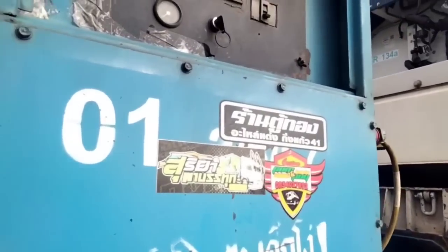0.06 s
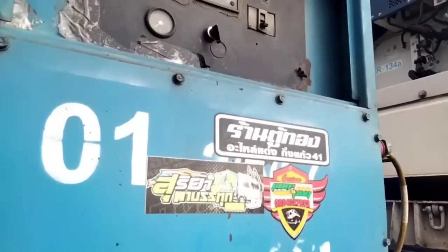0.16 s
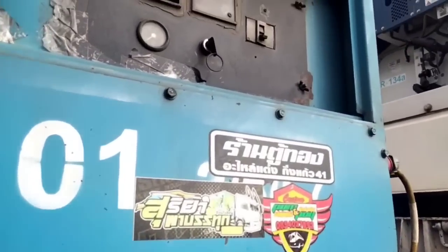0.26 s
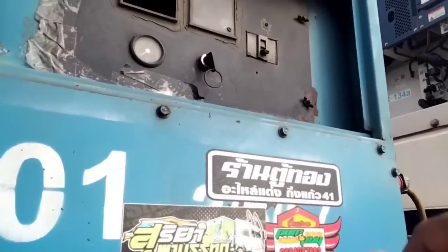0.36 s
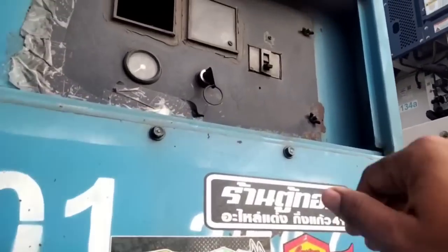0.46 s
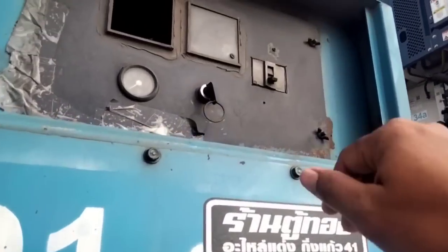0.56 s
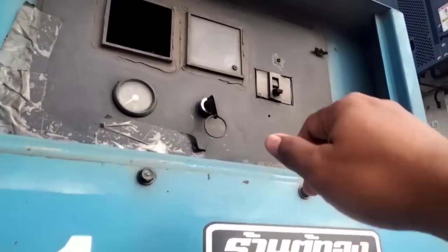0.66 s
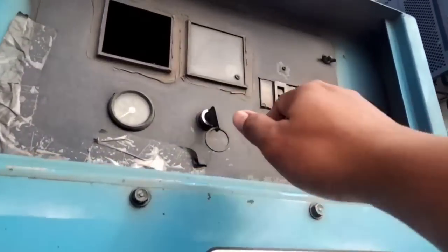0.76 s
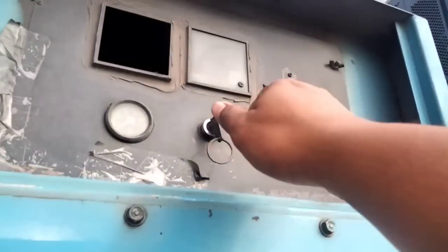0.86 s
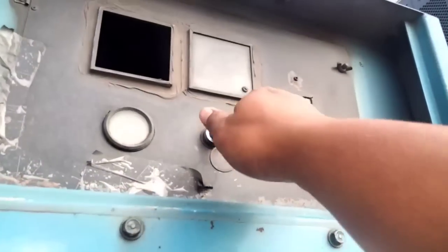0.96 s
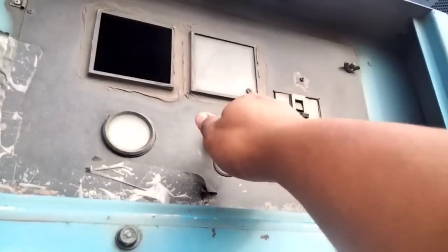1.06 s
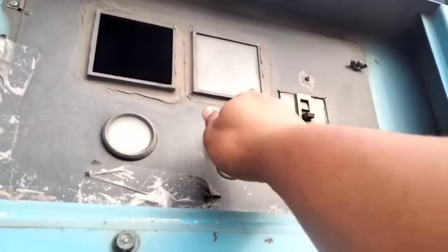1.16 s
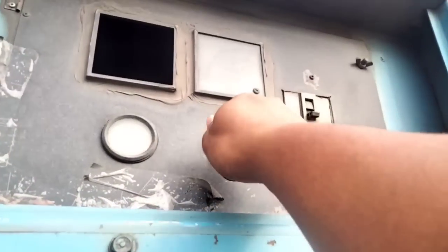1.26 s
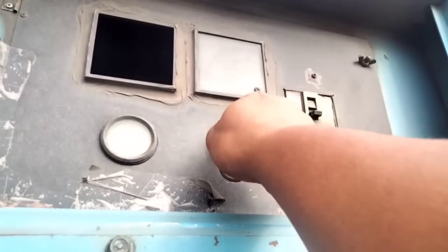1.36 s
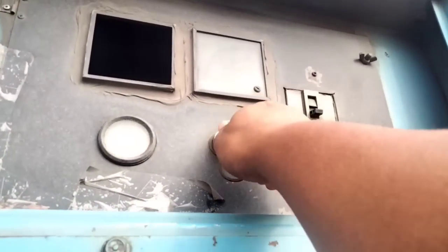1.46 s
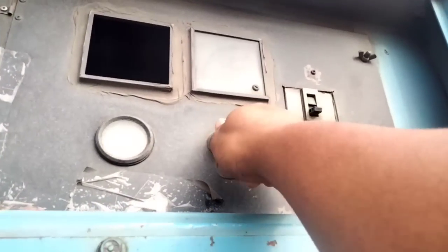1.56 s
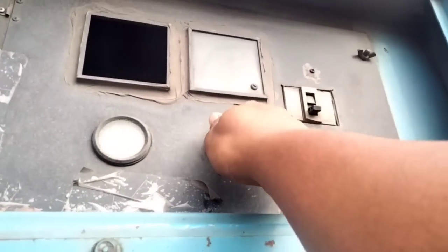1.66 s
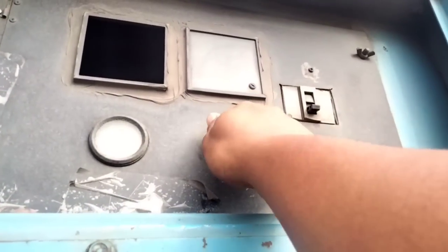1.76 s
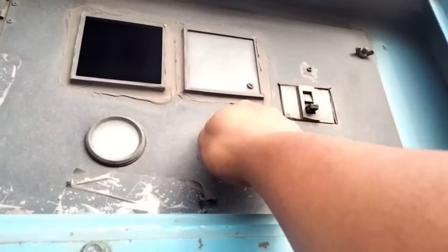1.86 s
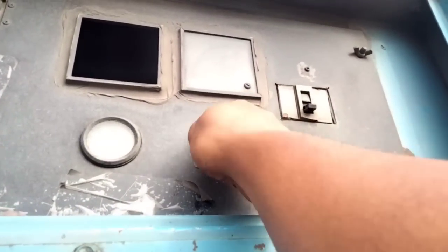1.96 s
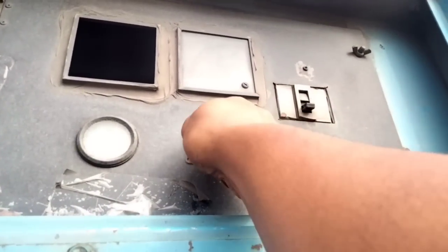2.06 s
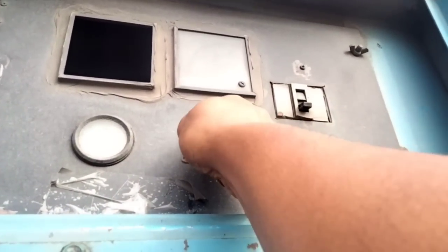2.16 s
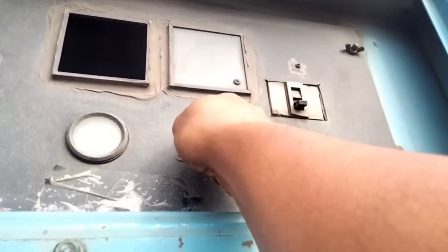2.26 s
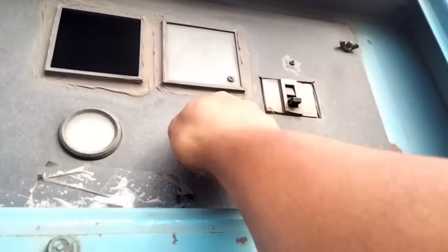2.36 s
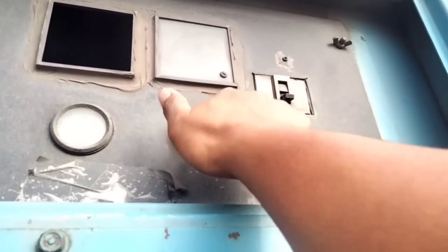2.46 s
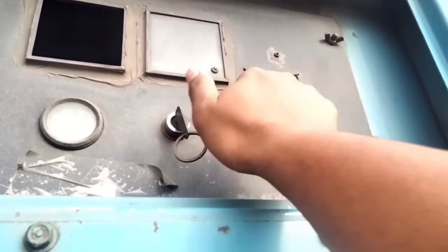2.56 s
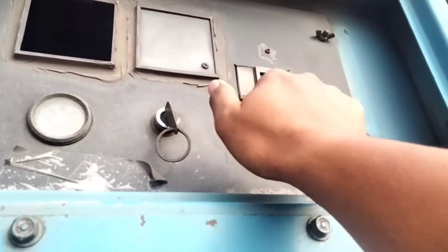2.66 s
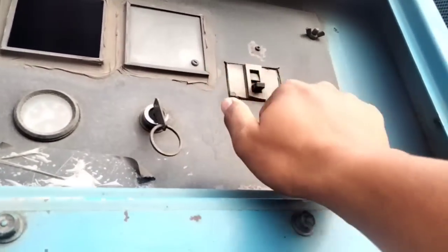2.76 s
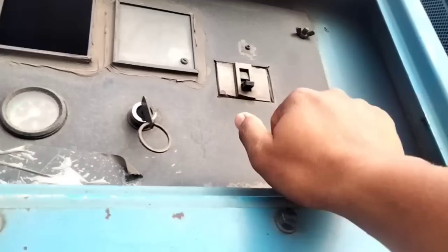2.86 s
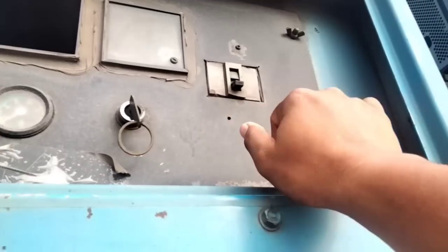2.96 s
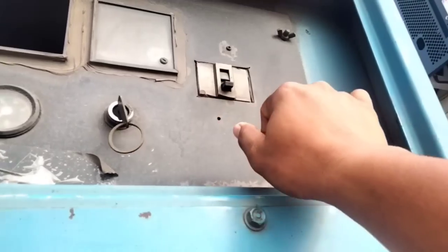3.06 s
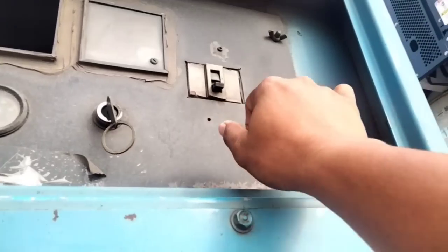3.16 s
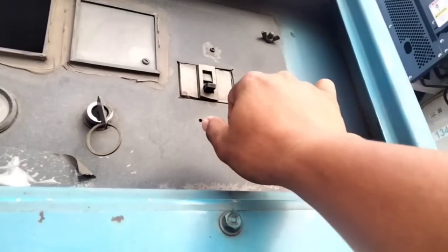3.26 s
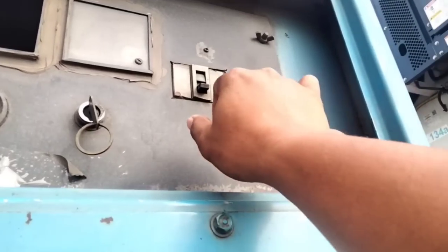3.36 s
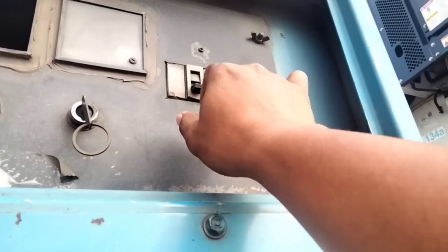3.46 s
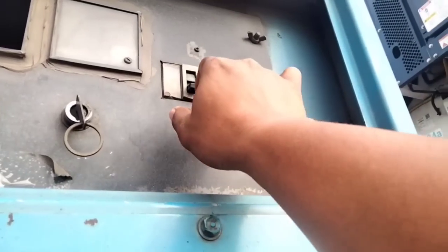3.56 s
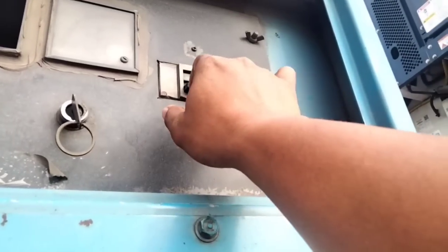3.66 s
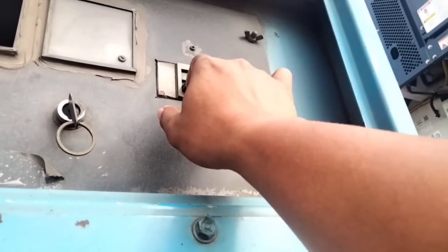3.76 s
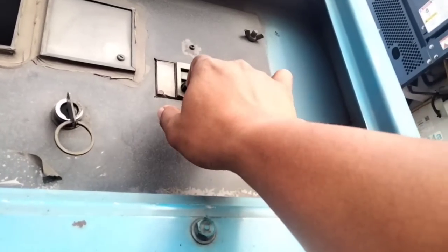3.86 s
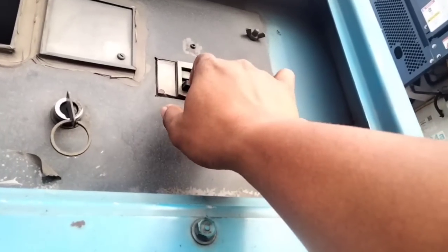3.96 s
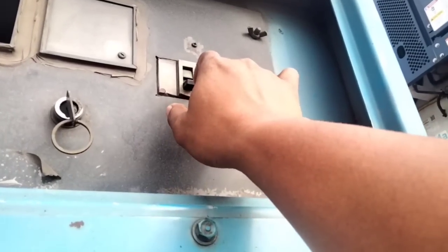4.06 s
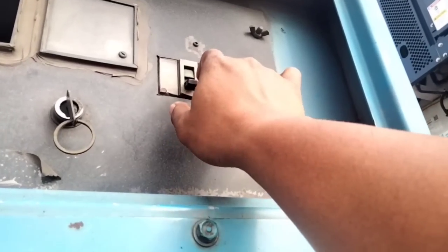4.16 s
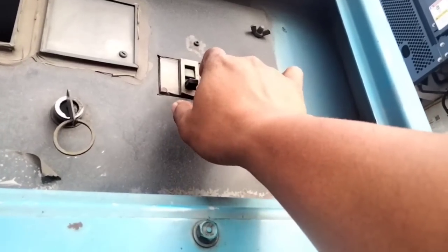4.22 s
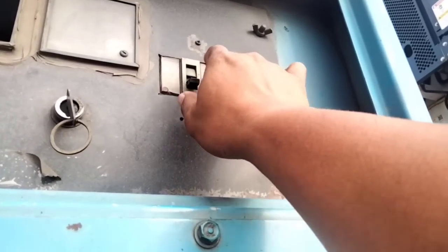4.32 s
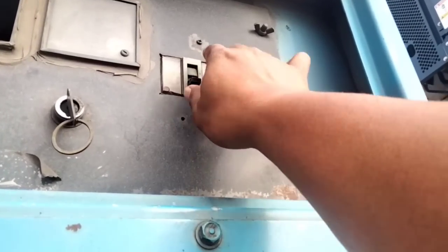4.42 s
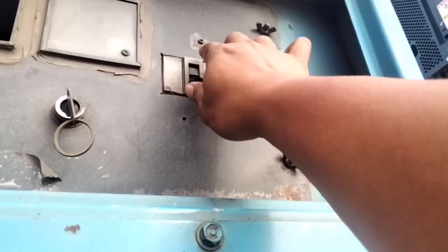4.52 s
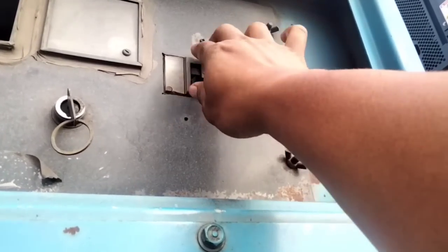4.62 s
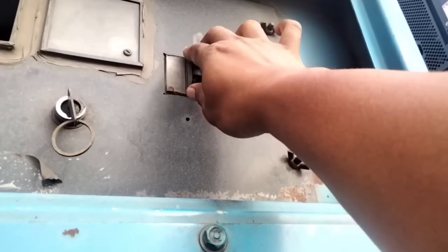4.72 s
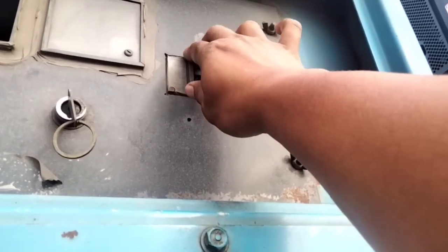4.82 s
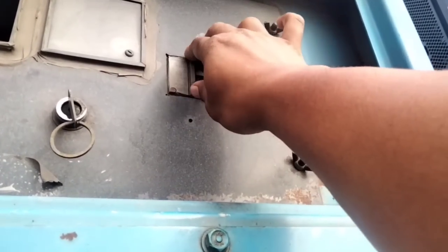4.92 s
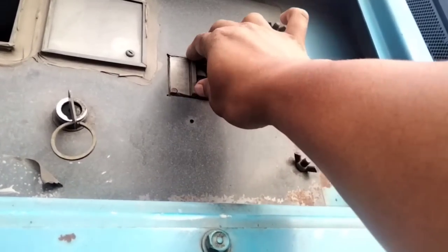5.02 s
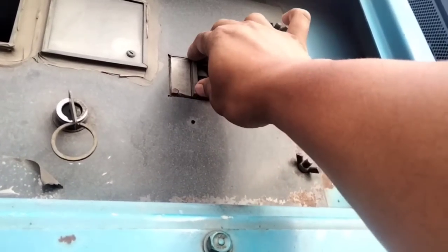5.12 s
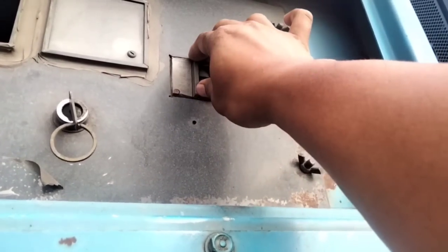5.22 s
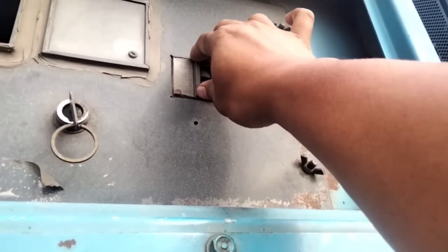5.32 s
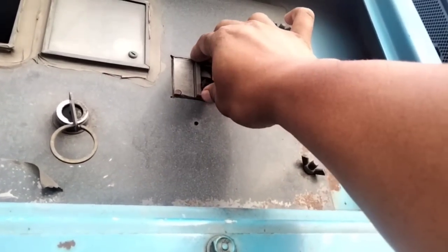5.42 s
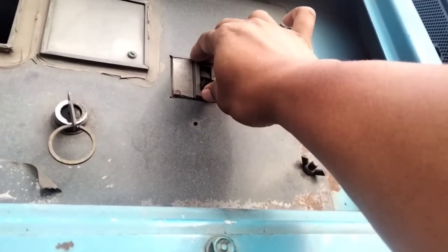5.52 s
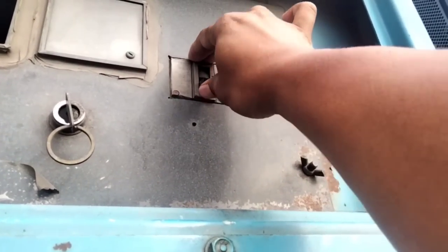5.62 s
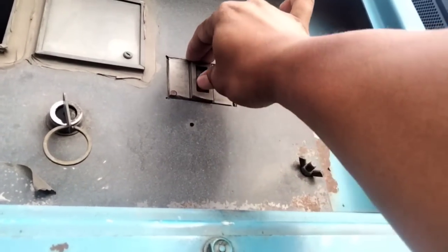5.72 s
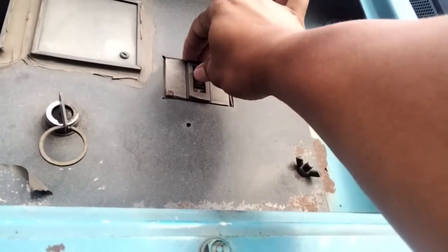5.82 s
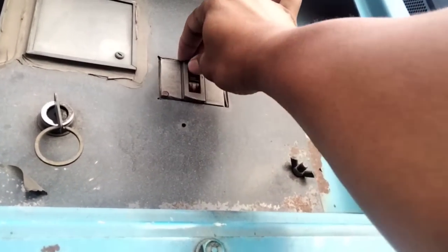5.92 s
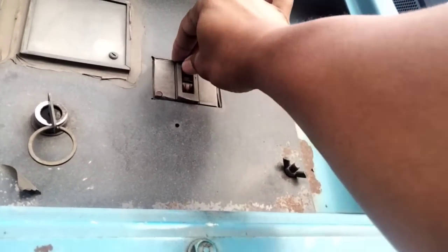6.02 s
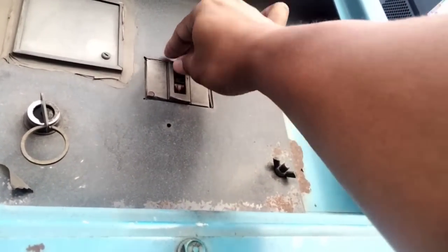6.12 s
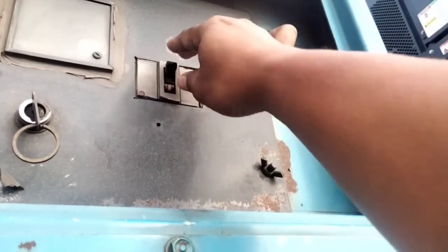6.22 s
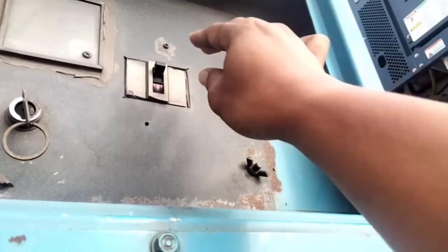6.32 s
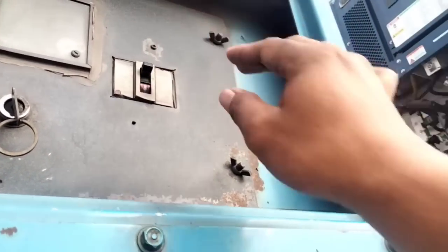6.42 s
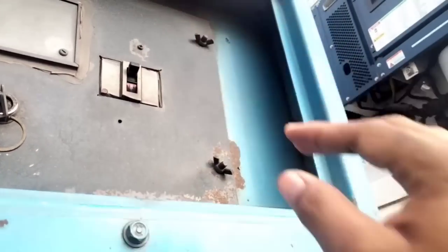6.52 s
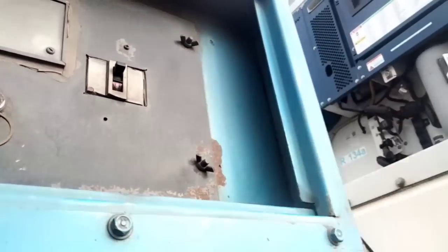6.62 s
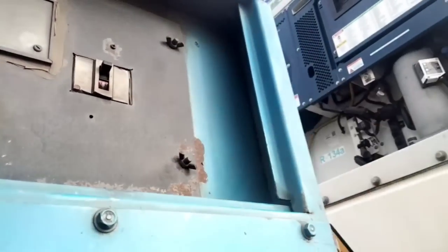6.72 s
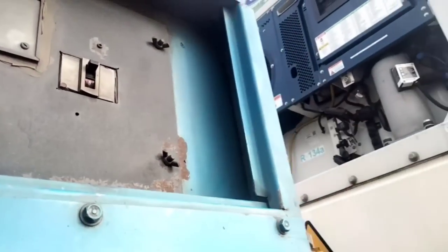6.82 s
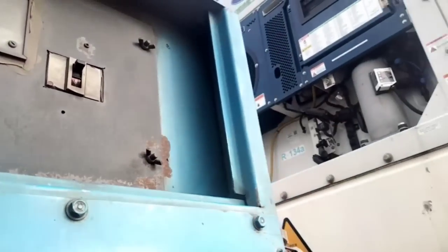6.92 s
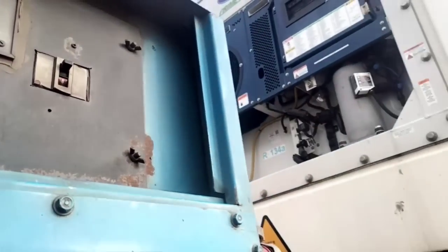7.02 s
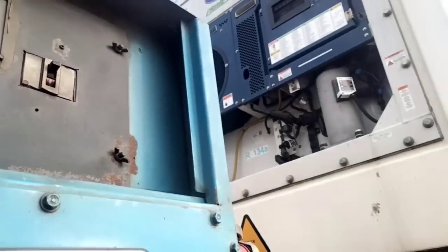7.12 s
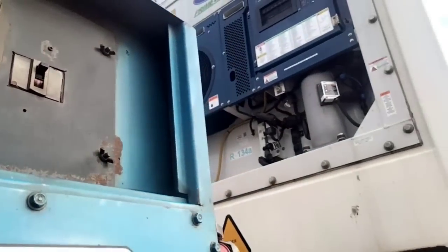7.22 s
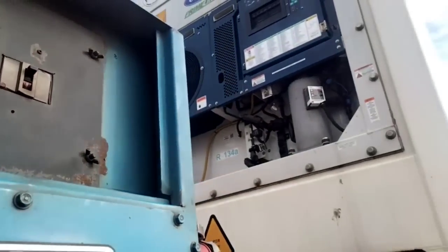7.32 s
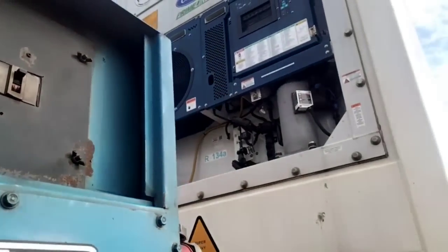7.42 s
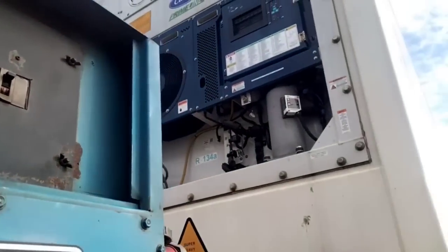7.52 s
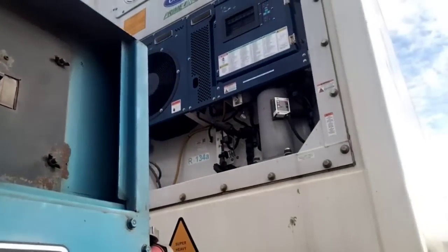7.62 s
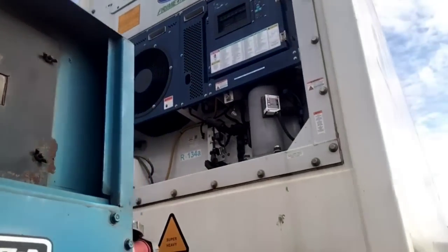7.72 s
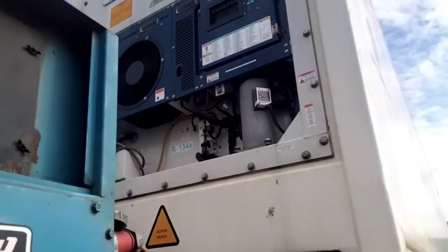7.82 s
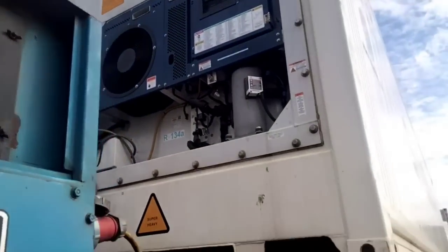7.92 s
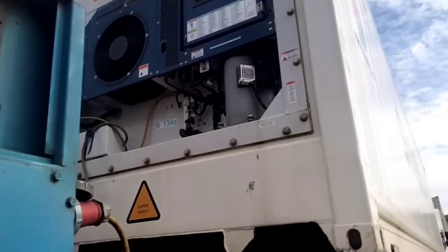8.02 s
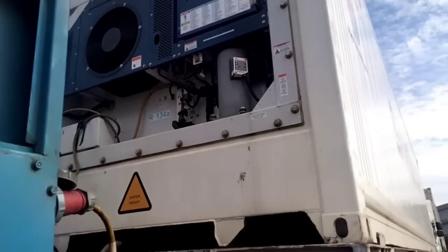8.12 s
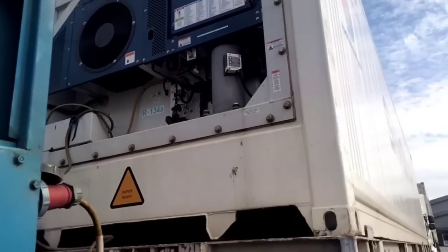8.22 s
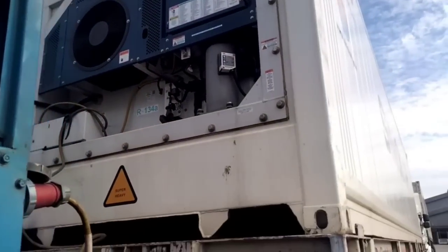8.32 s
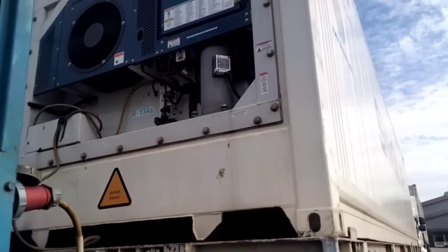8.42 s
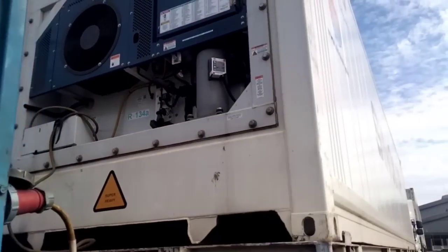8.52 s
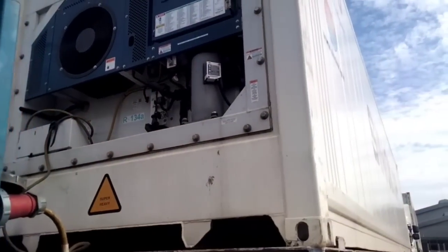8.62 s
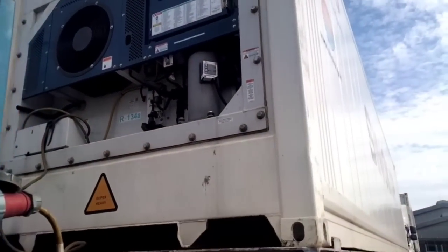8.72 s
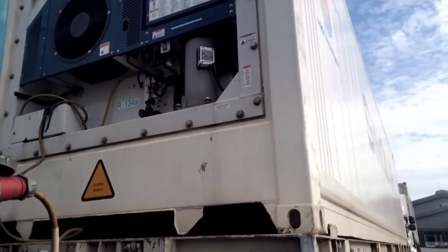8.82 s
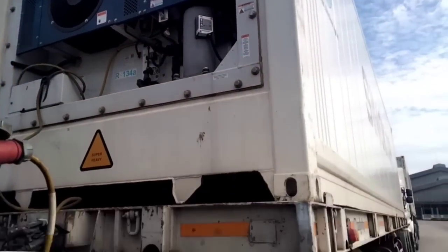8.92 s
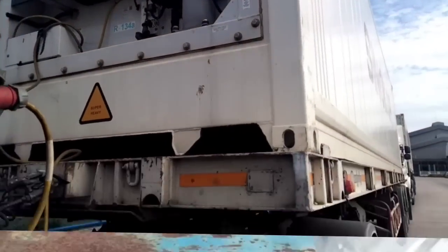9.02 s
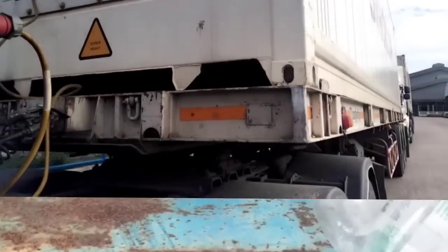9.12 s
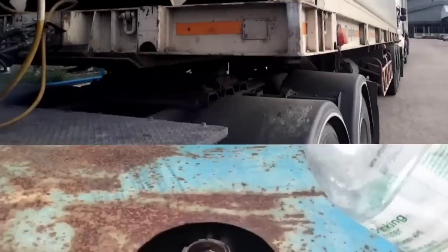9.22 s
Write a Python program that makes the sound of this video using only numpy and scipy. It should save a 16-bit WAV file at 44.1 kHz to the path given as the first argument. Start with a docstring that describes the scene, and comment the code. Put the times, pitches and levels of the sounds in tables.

```python
"""Cold start of a four-cylinder diesel generator in a container yard, heard close to its panel.
A far engine hums as summed harmonics over filtered noise; key-ring ticks are short noise bursts.
The starter clunks (noise), whines (mesh tones), grinds (noise) and squeals (unsteady sines) in two heaves.
The diesel stumbles, catches and holds speed: firing pulses, orders of the shaft, tap modes, rattling noise.
A breaker snaps, a limiter ducks behind it; the microphone moves round the side and finally turns away."""
import sys
import numpy as np
from scipy import signal
from scipy.fft import rfft, irfft, next_fast_len
from scipy.io import wavfile
from scipy.ndimage import uniform_filter1d, minimum_filter1d

SR = 44100
rng = np.random.default_rng(int(sys.argv[2]) if len(sys.argv) > 2 else 0)


def wav_record(signal):
    """Record a signal, one row per channel, as 16-bit PCM in the file named by sys.argv[1]."""
    frames = np.transpose(np.atleast_2d(signal))
    bounded = np.clip(frames, -1, 1)
    # unit amplitude maps onto the largest positive 16-bit level
    quanta = np.round(bounded * 32767).astype(np.int16)
    wavfile.write(sys.argv[1], SR, quanta)


N = 409248
TIME = np.arange(N) / SR
SIZE = next_fast_len(N, True)
HZ = np.fft.rfftfreq(SIZE, 1 / SR)

CATCH_S = 2.52  # the engine fires
WALK_S, WALK_LENGTH_S = 6.9, 0.9  # microphone leaves the panel for the side of the set
# resonances of the engine casing: f/Hz, width/Hz, lift/dB
CASING_MODES = [(88, 9, 6), (478, 57, 2.5), (833, 61, 5.5), (995, 80, 6.5), (1330, 200, 1.5),
                (2100, 130, 3), (4680, 95, 5)]


def amp(db):
    """Decibels to gain."""
    return 10 ** (np.asarray(db) / 20)


def unit(x):
    """Scales to rms 1."""
    return x / np.sqrt(np.mean(x ** 2) + 1e-20)


def noise():
    """White noise."""
    return rng.standard_normal(N)


def drift(hz):
    """Random values at rate hz, joined by straight lines, rms 1; holds the last value if they run out."""
    knots = rng.standard_normal(8000)
    return unit(np.interp(TIME * hz, np.arange(len(knots)), knots))


def sway(hz):
    """Slow, rounded wandering of rms 1: twelve sines from hz / 5 up to hz."""
    knots = TIME[::256]
    rates_hz = np.geomspace(hz / 5, hz, 12)[:, None]
    waves = np.sin(2 * np.pi * (rates_hz * knots + rng.random((12, 1))))
    return unit(np.interp(TIME, knots, waves.sum(0)))


def colour(x, points, modes=()):
    """Filters by a spectrum with resonances on top; white noise keeps its level."""
    f, db = np.transpose(points)
    gain = amp(np.interp(np.log(HZ + 1), np.log(f + 1), db))
    # steep skirts beyond the first and last point
    low_skirt = 1 + (.7 * f[0] / (HZ + 1)) ** 8
    high_skirt = 1 + (HZ / (1.3 * f[-1])) ** 8
    gain = gain / np.sqrt(low_skirt * high_skirt)
    for hz, width_hz, lift_db in modes:
        gain = gain * (1 + (amp(lift_db) - 1) / (1 + (2 * (HZ - hz) / width_hz) ** 2))
    return irfft(rfft(x, SIZE) * unit(gain), SIZE)[:N]


def dying(s, gain, t60_s, rise_s=0.00023):
    """Envelope of a blow at time s: linear rise, exponential decay."""
    age = TIME - s
    return gain * np.clip(age / rise_s, 0, 1) * np.exp(-np.log(1000) * np.maximum(age, 0) / t60_s)


def ramp(s, length_s):
    """Rises from 0 at time s to 1 over the length."""
    return np.clip((TIME - s) / length_s, 0, 1)


def settling(s, time_constant_s):
    """Stays at 1 until time s, then sinks towards 0."""
    return np.exp(-np.maximum(TIME - s, 0) / time_constant_s)


def arch(s, length_s):
    """A short swell with its top at time s."""
    return np.cos(np.pi * (TIME - s) / length_s) * (abs(TIME - s) < length_s / 2)


def crank():
    """Four-stroke cycles turned, counted from 3 s; the shaft never turns quite evenly."""
    # run-up, then governed speed: t/s, four-stroke cycle rate/Hz
    speed = [(2.01, 0), (2.3, 4), (2.5, 9.5), (2.6, 11.6), (2.8, 13.06), (3.05, 13.03), (3.25, 12.9),
             (3.5, 13.068)]
    turns = np.cumsum(np.interp(TIME, *np.transpose(speed))) / SR
    return turns - turns[3 * SR] + .0012 * drift(6)


def yard():
    """A far engine hums as harmonics, with a slow beat, over a wash of noise; it fires a little faster than the diesel."""
    # far engine tones: multiple of firing rate, level/dB
    far_orders = [(1, 2.5), (1.5, -17), (2, -15.5), (2.999, -9.5), (3.501, -23), (4.25, -19)]
    # yard wash spectrum: f/Hz, relative level/dB
    air_spectrum = [(15, -12), (25, -7), (37, -6.5), (59, -5.5), (80, -26), (165, -15.5), (189, -30),
                    (228, -14.5), (291, -29), (333, -25.5), (672, -34.5), (905, -32.5), (1040, -34),
                    (8270, -45.5), (15800, -59)]
    # yard wash resonances: f/Hz, width/Hz, lift/dB
    air_modes = [(51, 51, -25), (970, 120, -2), (2010, 190, 4), (5670, 1700, -5), (8200, 830, 4.5)]
    firing_hz, in_step_s = 53.785, 4.88  # about in step with the diesel at in_step_s
    hum_db, beat_db, beat_hz, beat_top_s = -35.5, 3, 2.2, 0.32
    in_step = 4 * (np.interp(in_step_s, TIME, crank()) - .09)
    turns = in_step + firing_hz * (TIME - in_step_s) + 0.031 * drift(3.4)
    hum = sum(amp(db + 1.2 * drift(5.2)) * np.cos(2 * np.pi * k * turns) for k, db in far_orders)
    wash = colour(noise(), air_spectrum, air_modes)
    beat = beat_db * np.cos(2 * np.pi * beat_hz * (TIME - beat_top_s))
    return hum * amp(hum_db + beat) + amp(-42.5) * wash


def panel():
    """Key-ring ticks and the breaker's snap are noise bursts; the panel rings briefly after the snap."""
    # key and ring ticks: t/s, level/dB
    key_ticks = [(1.1217, -41), (1.1631, -46), (1.1925, -48), (1.224, -54), (1.7123, -48), (1.824, -55),
                 (1.979, -47), (1.997, -37)]
    # tick spectrum: f/Hz, relative level/dB
    key_spectrum = [(2500, -12), (4500, -12), (6800, -15), (8400, -1), (10500, -10), (15500, -23)]
    # breaker spectrum: f/Hz, relative level/dB
    breaker_spectrum = [(200, -8), (1000, -4), (3000, -4), (6000, -7), (8800, 2), (11000, -1), (15500, -7)]
    breaker_s, snap_db, ring_db = 5.9803, 4, -22
    ticks = sum(dying(s, amp(db), t60_s=.07) for s, db in key_ticks)
    snap = dying(breaker_s, amp(snap_db), t60_s=.012, rise_s=.0003)
    ring = dying(breaker_s, amp(ring_db), t60_s=.2)
    breaker = colour((snap + ring) * noise(), breaker_spectrum, [(4220, 120, 5)])
    return colour(ticks * noise(), key_spectrum) + breaker


def squeals():
    """Brief high notes of the starter, some overtones of its gear whine: sines of unsteady pitch."""
    # squeals: middle t/s, length/s, f/Hz, pitch spread/Hz, level/dB
    squeal_rows = [(2.118, 0.044, 2372, 20, -16), (2.066, .03, 4900, 70, -29), (2.12, .07, 4800, 140, -26),
                   (2.242, .026, 4980, 80, -23), (2.117, 0.064, 8280, 152, -24),
                   (2.35, 0.044, 5250, 260, -19.5), (2.346, 0.027, 10550, 220, -15),
                   (2.47, 0.038, 8480, 232, -16.5), (2.497, 0.04, 7760, 220, -24)]
    total = 0
    for s, length_s, hz, spread_hz, db in squeal_rows:
        phase = 2 * np.pi * np.cumsum(hz + spread_hz * drift(900)) / SR
        total = total + amp(db) * arch(s, length_s) * np.sqrt(2) * np.sin(phase)
    return total


def cover_hum():
    """A sheet-metal cover hums on one low note as the engine runs up, then dies away."""
    note_hz, waver_hz, level_db = 85.5, 1.2, -32.5
    start_s, rise_s, fade_s, fade_db_per_s = 2.3, 0.49, 3.2, 16
    level = ramp(start_s, rise_s) * amp(level_db - fade_db_per_s * np.maximum(TIME - fade_s, 0))
    phase = 2 * np.pi * np.cumsum(note_hz + waver_hz * drift(20)) / SR
    return level * np.sqrt(2) * np.sin(phase)


def cold_knocks():
    """The cold engine fires hard twice; each bang is noise ringing the casing."""
    # hard firings: t/s, level/dB
    bangs = [(2.566, -18), (2.648, -25)]
    # bang spectrum: f/Hz, relative level/dB
    bang_spectrum = [(200, -7), (700, -3), (1050, -9), (1700, -3), (2500, -5), (4500, -12), (9000, -15)]
    envelope = sum(dying(s, amp(db), t60_s=.23, rise_s=.013) for s, db in bangs)
    return colour(envelope * noise(), bang_spectrum, CASING_MODES)


def starter():
    """The pinion slams in, then whines and grinds on the flywheel teeth in two frame-shaking heaves until the catch."""
    # heaves: t/s, length/s, first mesh f/Hz, last mesh f/Hz, whine/dB, groan/dB, grind/dB, scrape/dB,
    # shudder/dB, fade t60/s
    heaves = [(2.008, 0.115, 830, 1200, -15.5, -22, -23, -29, -12, .17),
              (2.232, 0.22, 840, 785, -22, -19.5, -27.5, -19, -18, .25)]
    # gear blows: t/s, clunk/dB, metal clash/dB, t60/s
    gear_blows = [(2.009, -6, -6, 0.057), (2.034, -19, -16.5, 0.13), (2.152, -47, -18.5, 0.22),
                  (2.231, -8, -3.5, 0.031), (2.259, -29, -13, 0.23), (2.330, -46, -15.5, 0.39)]
    # groan, grind and scrape spectra: f/Hz, relative level/dB
    groan_spectrum = [(40, 1.5), (90, -4.5), (150, -2), (240, -5.5), (300, -1), (420, -11), (700, -9.5)]
    grind_spectrum = [(240, -42), (400, -16), (463, -7), (817, 0.5), (1040, 2), (1150, -4), (1360, -1),
                      (1710, -5), (1850, -0.5), (2320, 2), (2590, 0.5), (4780, -20), (6000, -21),
                      (7800, -45), (13200, -120)]
    scrape_spectrum = [(2060, -11), (3500, -2.5), (4890, -1), (5210, -7), (5650, -4.5), (6620, -4),
                       (8570, 6), (10800, -1.5), (11400, -4), (12900, -3), (15800, -12)]
    # starter housing resonances: f/Hz, width/Hz, lift/dB
    housing_modes = [(840, 90, 6.5), (1474, 90, 8), (1780, 90, 8), (2027, 110, 7.5), (2400, 70, 3),
                     (3060, 350, 7), (4970, 120, 7), (8080, 200, 6)]
    rise_s, coast_db = .022, -8  # coast: between and after heaves, against their level
    spin_s, whine_t60_s, overtone_db = .105, 1.2, -10
    mesh_unsteady, mesh_flicker_db = .035, 3.5  # pitch share, level
    growl_hz, growl_depth = 50, .5  # whine throbs at a steady growl rate
    frame_hz, frame_waver_hz, frame_t60_s = 230.4, 13, .51
    whine, frame, groan, grind, scrape = np.zeros((5, N))
    ends_s = [row[0] for row in heaves[1:]] + [CATCH_S]
    for row, end_s in zip(heaves, ends_s):
        s, length_s, first_hz, last_hz, whine_db, groan_db, grind_db, scrape_db, shudder_db, t60_s = row
        push = ramp(s, rise_s) * settling(s + length_s, t60_s / np.log(1000))
        coast = amp(coast_db) * ramp(s, rise_s) * (1 - ramp(end_s, rise_s))
        effort = np.maximum(push, coast)
        hz = first_hz + (last_hz - first_hz) * np.sin(np.pi / 2 * ramp(s, spin_s)) ** 2
        mesh = 2 * np.pi * np.cumsum(hz * (1 + mesh_unsteady * drift(400))) / SR
        tones = sum(amp(overtone_db * k) * np.sin((k + 1) * mesh) for k in range(3))
        whine += dying(s, amp(whine_db), whine_t60_s) * push * tones
        frame += dying(s, amp(shudder_db), frame_t60_s, rise_s)
        groan += amp(groan_db) * effort
        grind += amp(grind_db) * effort
        scrape += amp(scrape_db) * effort
    whine *= 1 + growl_depth * np.cos(2 * np.pi * growl_hz * TIME)
    teeth = 1 + .12 * np.cos(2 * np.pi * 110 * crank())  # 110 teeth pass per cycle
    clunk = sum(dying(s, amp(db), t60_s, rise_s=.0036) for s, db, _, t60_s in gear_blows)
    clash = sum(dying(s, amp(db), t60_s, rise_s=.0054) for s, _, db, t60_s in gear_blows)
    body = colour((grind * teeth + clunk) * noise(), grind_spectrum, housing_modes)
    bright = colour((scrape * teeth + clash) * amp(2 * drift(600)) * noise(), scrape_spectrum)
    shudder = frame * np.sin(2 * np.pi * np.cumsum(frame_hz + frame_waver_hz * drift(80)) / SR)
    low = groan * colour(noise(), groan_spectrum)
    return low + shudder + whine * amp(mesh_flicker_db * drift(250)) + body + bright


def firings(turns, place, uneven_db, jitter_s):
    """One impulse each time a cylinder fires, never quite alike in size or time."""
    at = np.flatnonzero(np.diff(np.floor(turns - place)) > 0)
    late, size = rng.standard_normal((200, 2))[:len(at)].T
    train = np.zeros(N)
    train[np.clip(at + np.round(late * jitter_s * SR).astype(int), 0, N - 1)] = amp(uneven_db * size)
    return train


def tappets(turns):
    """An injector and two valves a cylinder tap in turn; each has four notes, struck differently every time."""
    count, low_hz, high_hz, t60_s = 12, 700, 5200, .012
    detune_share, uneven_db = .03, 6
    age = np.arange(SR // 100) / SR
    places = rng.permutation(np.linspace(0, 1, count * 4)).reshape(count, 4, 1)
    notes_hz = low_hz * (high_hz / low_hz) ** places
    step = np.floor(turns * count).astype(int)
    fade, taps = amp(-60 * age / t60_s), np.zeros(N + len(age))
    for at in np.flatnonzero(np.diff(step)):
        size, detune, phase = rng.standard_normal((3, 4, 1))
        hz = notes_hz[step[at] % count] * (1 + detune_share * detune)
        modes = amp(uneven_db * np.clip(size, -2, 1.5)) * np.sin(2 * np.pi * (hz * age + phase))
        taps[at:at + len(age)] += fade * modes.sum(0)
    return unit(taps[:N])


def reflections(x):
    """Short echoes off the steel ripple the spectrum above 700 Hz; ripples slide as the hand-held microphone sways."""
    count, echo_db, sway_m, sway_hz = 9, -10, .16, 1.1
    delay_s, facing = rng.uniform(.0008, .009, count), rng.uniform(-1, 1, count)
    size = amp(echo_db) * rng.choice([-1, 1], count) / np.sqrt(count)
    moved_s = sway_m * sway(sway_hz) / 343  # path change over the speed of sound
    high = x - signal.sosfiltfilt(signal.butter(2, 700, fs=SR, output="sos"), x)
    return x + sum(g * np.interp(TIME - d - f * moved_s, TIME, high) for g, d, f in zip(size, delay_s, facing))


def running():
    """Gains of boom, drone, knock and rattle: the engine catches, surges and settles; the boom recedes least."""
    # level dips while the hand works at the breaker: middle t/s, length/s, change/dB
    dips = [(4.85, 0.32, -2.2), (5.767, 0.61, -1.2), (6.24, 0.23, -2)]
    drone_db, knock_db, rattle_db = -23.3, -27.1, -27.3
    recede_db_per_s, turn_s, turn_db_per_s = .55, 8.8, 11.5  # drifts off, then turns away
    boom_s, boom_rise_s, boom_db = 2.72, .09, -23.2
    surge_db, surge_decay_s = 5.5, .22  # surge of fuel
    dip_db = sum(db * arch(s, length_s) for s, length_s, db in dips)
    near = amp(dip_db - turn_db_per_s * np.maximum(TIME - turn_s, 0))
    firing = ramp(CATCH_S, .017) * near
    away_db = recede_db_per_s * np.maximum(TIME - WALK_S, 0)
    # the exhaust coughs once, then booms
    cough = amp(-23) * arch(2.6, .12)
    swell_db = surge_db * settling(boom_s + boom_rise_s, surge_decay_s)
    boom = cough + ramp(boom_s, boom_rise_s) * amp(boom_db + swell_db - .25 * away_db + drift(6.7))
    # the drone starts 1 dB up and eases
    drone = ramp(CATCH_S, .033) * near * amp(drone_db + settling(CATCH_S, .21) - away_db)
    # the knock gains 0.32 dB per s
    knock = firing * amp(knock_db - away_db + .32 * (TIME - CATCH_S))
    # loose metal shakes as the speed builds, 1 dB softer at first
    shaken = firing * (1 - settling(CATCH_S - .15, .15))
    rattle = shaken * amp(rattle_db - away_db - settling(CATCH_S, 3))
    return boom, drone, knock, rattle


def diesel():
    """Exhaust pulses boom, the casing drones, each firing knocks the block and shakes loose metal, valve gear taps."""
    # engine tones: multiple of cycle rate, relative level/dB
    orders = [(8, -11), (12, -2.5), (14, -8), (16, 3.5), (18, -10), (20, -9), (21, -10), (22, -1.5),
              (24, -11), (28, -10), (32, -14), (36, -19), (37, -21.5), (51, -25.5), (64, -19.5), (76, -17),
              (96, -21)]
    # one row a cylinder: place in cycle/0-1, knock/dB, rattle/dB
    cylinders = [(.11, 4.5, 5), (.42, 2.5, 7.5), (.585, 3.5, 3), (.86, 4.5, 9)]
    # spectra of taps, clatter, rattle and ragged chugs: f/Hz, relative level/dB
    tap_spectrum = [(500, 6), (1000, -1.5), (1500, -1), (2200, -6), (3300, -6), (4700, -6.5), (6000, -3),
                    (15000, 5)]
    clatter_spectrum = [(25, 3), (60, -23), (90, 0), (140, 1), (240, 2.5), (450, 2), (620, -2), (950, -8.5),
                        (1500, -4.5), (2700, -5), (4300, -5), (5500, -14.5), (6500, -8.5), (7500, -4)]
    rattle_spectrum = [(3240, -41), (5500, -13.5), (6770, -14.5), (7560, -3), (8290, 0.5), (10800, -3.5),
                       (13500, -3), (15100, -5), (15800, -28)]
    chug_spectrum = [(35, -3), (48, 3), (70, 2), (92, 6), (150, 1), (260, 6), (400, -3), (650, -10),
                     (1000, -8), (1600, -25)]
    # colour in front of the key switch: f/Hz, relative level/dB
    key_place = [(30, 5.5), (500, 1.5), (2000, 2.5), (4000, 1.5), (9000, 0.5), (15800, -0.5)]
    # its resonances: f/Hz, width/Hz, lift/dB
    key_place_modes = [(960, 200, 2.5), (2100, 350, 1.5)]
    # colour beside the set: f/Hz, relative level/dB
    side_place = [(50, 1), (140, 6.5), (230, 4), (370, 2.5), (750, -2), (1200, -1.4), (2100, -1.1),
                  (3700, -1.4), (5200, 2), (8000, -0.4), (14000, 4)]
    # its resonances: f/Hz, width/Hz, lift/dB
    side_place_modes = [(810, 40, 0), (1070, 39, 3), (1490, 140, 4.5), (2270, 90, 2.5), (3730, 460, 6)]
    # colour of the drone beside the set: f/Hz, relative level/dB
    side_drone = [(50, -6), (157, -1), (209, -3.5), (290, -5), (370, 0), (14000, 0)]
    knock_t60_s, ring_t60_s, chug_t60_s = .45, .2, .07
    shake_rise_s, shake_hold_s, shake_t60_s, shake_floor = .001, .007, .06, 1.1
    even_s, even_decay_s, ragged_left = 2.68, .1, .15  # ragged burning evens out
    boom, drone, knock, rattle = running()
    turns = crank()
    age = np.arange(SR // 6) / SR
    burst = np.minimum(age / shake_rise_s, 1) * amp(-60 * np.maximum(age - shake_hold_s, 0) / shake_t60_s)
    ring, blows, shaking = np.zeros((3, N))
    for place, knock_db, rattle_db in cylinders:
        train = firings(turns, place, uneven_db=1.3, jitter_s=.00006)
        # each cylinder rings the block in its own way, the same at every firing
        response = rng.standard_normal(len(age)) * amp(knock_db - 60 * age / ring_t60_s)
        ring += signal.oaconvolve(train, response)[:N]
        blows += amp(knock_db) * train
        shaking += amp(rattle_db) * train
    strokes = unit(signal.oaconvolve(blows, amp(-60 * age / chug_t60_s))[:N])
    blows = unit(signal.oaconvolve(blows, amp(-60 * age / knock_t60_s))[:N])
    shaking = unit(signal.oaconvolve(shaking, burst)[:N])
    # the ring rules the midrange; below and above it the clatter is new each time
    ring = signal.lfilter(*signal.butter(1, [350, 2400], "bandpass", fs=SR), unit(ring))
    loose = unit((1.6 + blows) * amp(drift(500) + .7 * drift(14)) * noise())
    loose = loose - .5 * signal.lfilter(*signal.butter(1, [450, 4000], "bandpass", fs=SR), loose)
    clatter = colour(ring + loose, clatter_spectrum, CASING_MODES)
    clatter = clatter + amp(-7.5) * colour(tappets(turns), tap_spectrum)
    # loose sheet metal fizzes, with flaring noise on top
    flares = noise() * np.clip(amp(5 * drift(1500)), 0, 5)
    shake = (shake_floor + shaking) * amp(.9 * drift(11))
    hiss = amp(1.3 * drift(600)) * noise()
    fizz = colour(unit(shake * (hiss + .45 * flares)), rattle_spectrum)
    metal = knock * clatter + rattle * fizz
    # colour follows the microphone from key switch to breaker, then round the side
    at_key, at_side = 1 - ramp(3.56, 2.2), ramp(WALK_S, WALK_LENGTH_S)
    at_panel = at_key * colour(metal, key_place, key_place_modes) + (1 - at_key) * metal
    beside = colour(metal, side_place, side_place_modes)
    metal = reflections((1 - at_side) * at_panel + at_side * beside)
    # ragged chugs give way to steady tones
    stumble = ragged_left + (1 - ragged_left) * settling(even_s, even_decay_s)
    tones = sum(amp(db + 1.23 * drift(9)) * np.cos(2 * np.pi * (k * turns + rng.random())) for k, db in orders)
    chugs = colour(strokes * noise(), chug_spectrum)
    casing = (1 - stumble) * unit(tones) + amp(-1.2) * stumble * chugs
    casing = (1 - at_side) * casing + at_side * colour(casing, side_drone)
    exhaust = np.sqrt(2) * np.cos(2 * np.pi * 4 * (turns - .09))  # four firings a cycle
    return boom * exhaust + drone * casing + metal


def scene():
    """Everything at one microphone, first close to the panel."""
    return (yard() + panel() + squeals() + cover_hum() + cold_knocks() + starter() + diesel())[None]


def record(dry):
    """A look-ahead limiter holds its gain down for a tenth of a second after a peak; then soft clip and low-pass."""
    ceiling, clip_level, edge_hz = .21, .47, 15900
    sensed = signal.lfilter(*signal.butter(2, 500, "high", fs=SR), dry[0])
    level = np.sqrt(abs(uniform_filter1d(sensed ** 2, round(.002 * SR))))
    allowed = np.minimum(1, ceiling / (level + 1e-9))
    hold, ahead = round(.106 * SR), round(.007 * SR)
    held = minimum_filter1d(allowed, hold, origin=hold // 2 - ahead)
    x = dry[0] * uniform_filter1d(held, ahead)
    x = x / (1 + (x / clip_level) ** 8) ** (1 / 8)
    lowpass = signal.firwin(511, edge_hz, window=("kaiser", 9), fs=SR)
    return signal.oaconvolve(x, lowpass, "same")[None]


dry = scene()
out = record(dry)
wav_record(out)
```